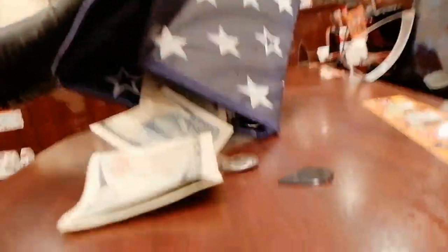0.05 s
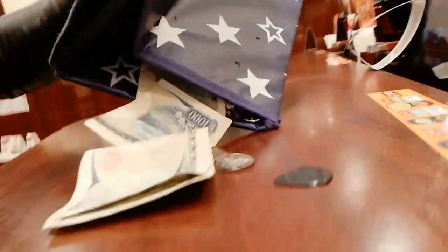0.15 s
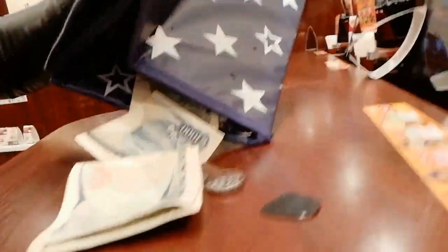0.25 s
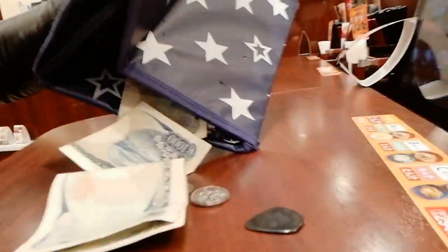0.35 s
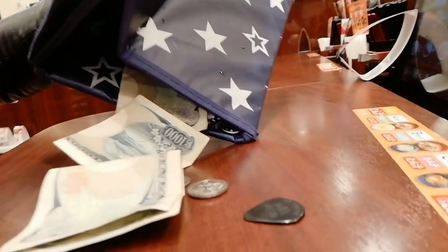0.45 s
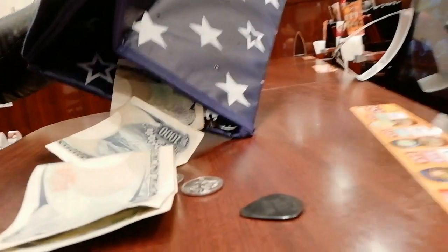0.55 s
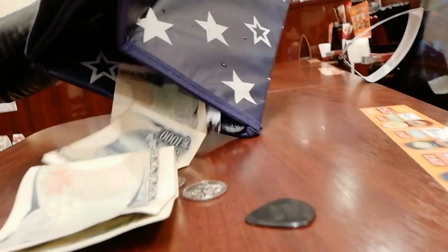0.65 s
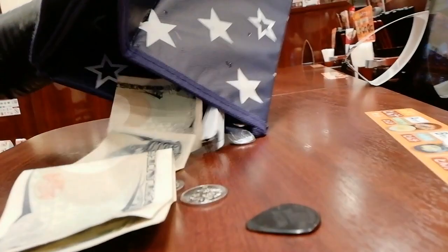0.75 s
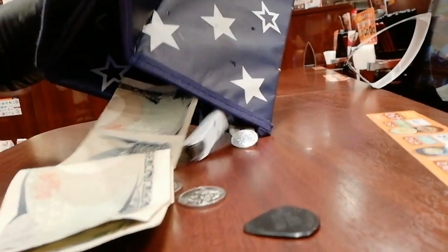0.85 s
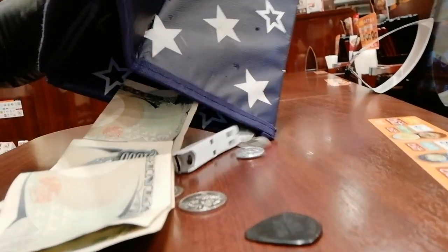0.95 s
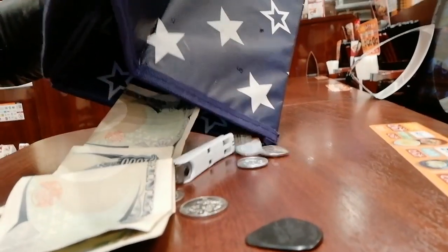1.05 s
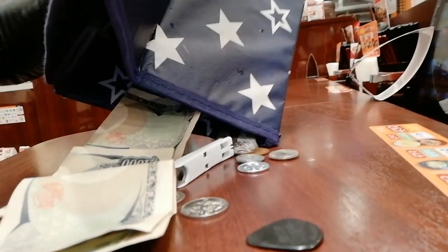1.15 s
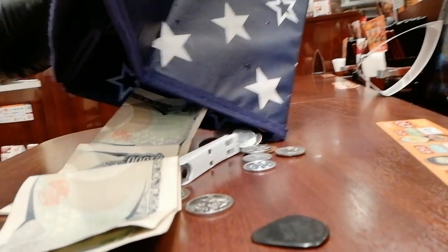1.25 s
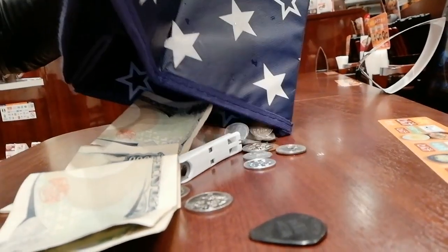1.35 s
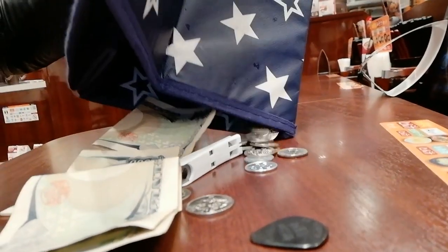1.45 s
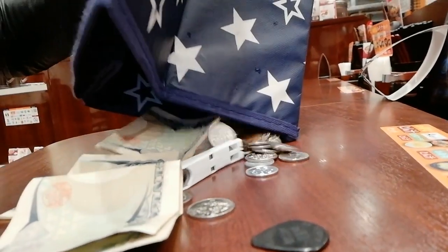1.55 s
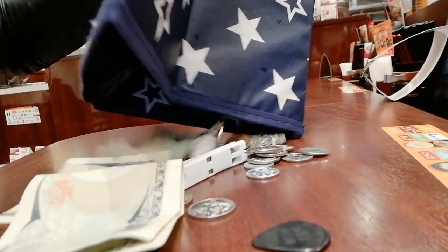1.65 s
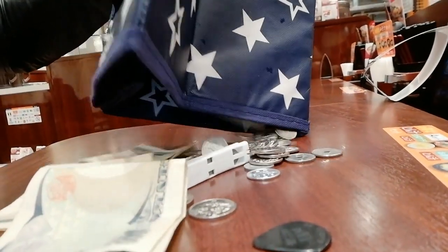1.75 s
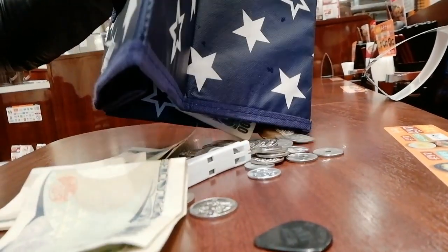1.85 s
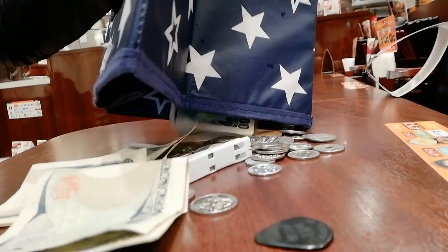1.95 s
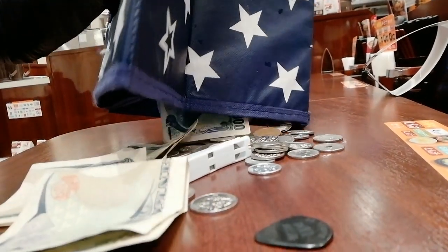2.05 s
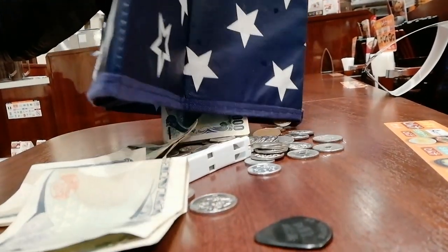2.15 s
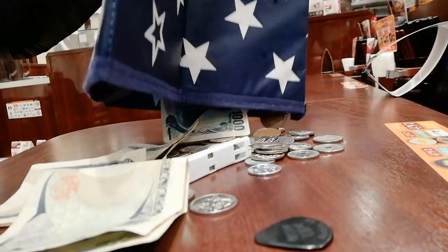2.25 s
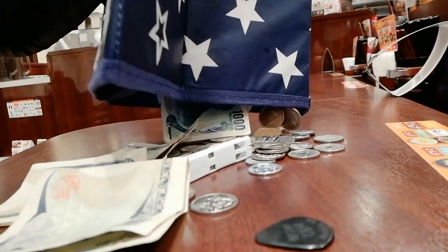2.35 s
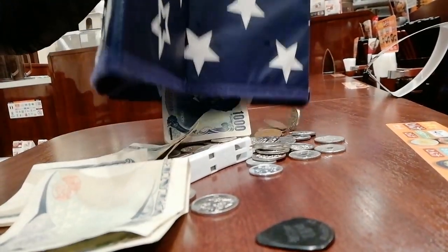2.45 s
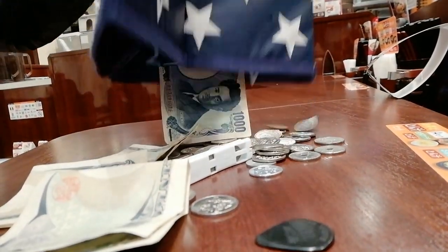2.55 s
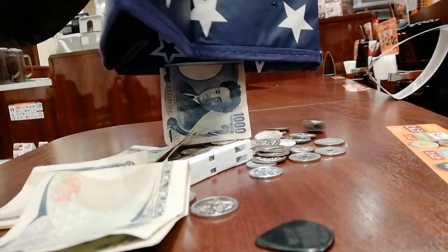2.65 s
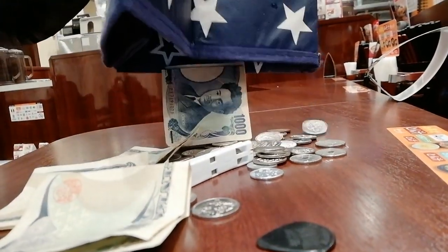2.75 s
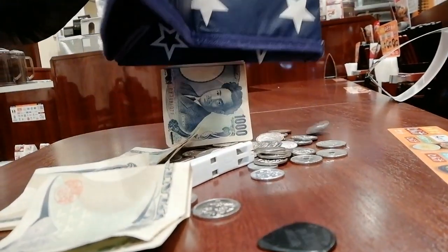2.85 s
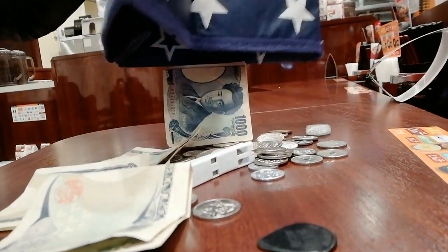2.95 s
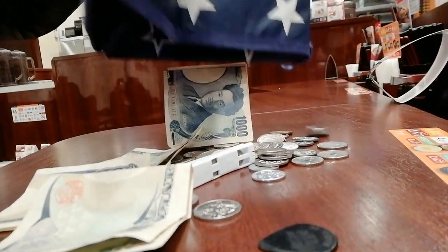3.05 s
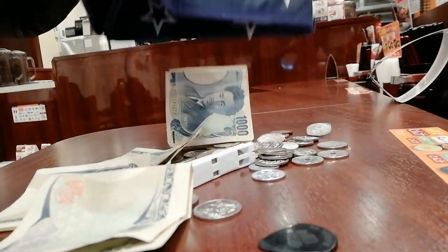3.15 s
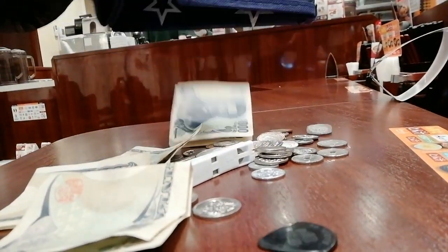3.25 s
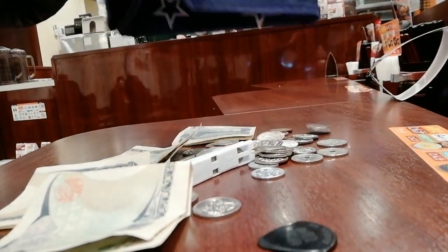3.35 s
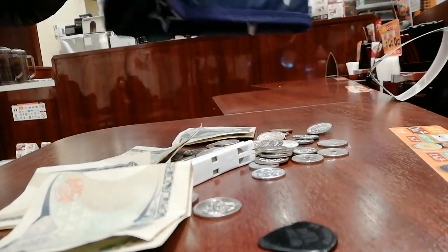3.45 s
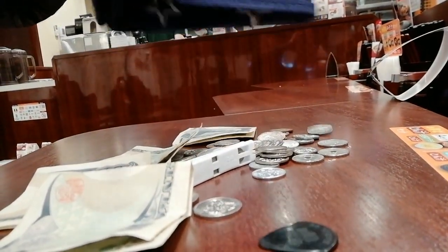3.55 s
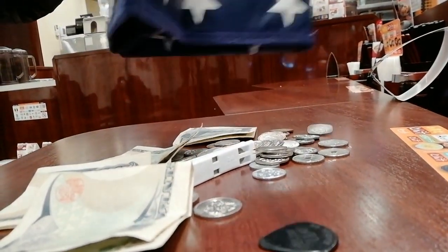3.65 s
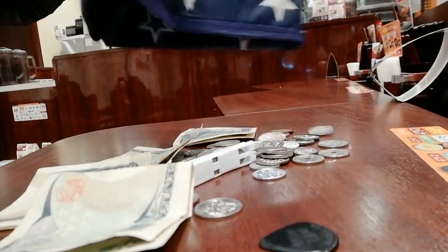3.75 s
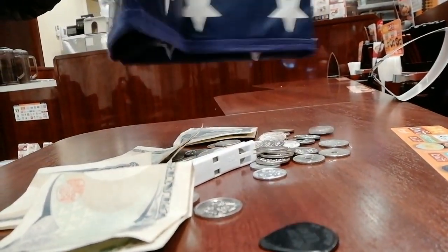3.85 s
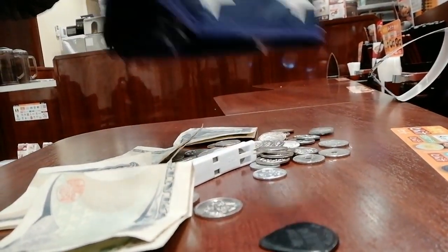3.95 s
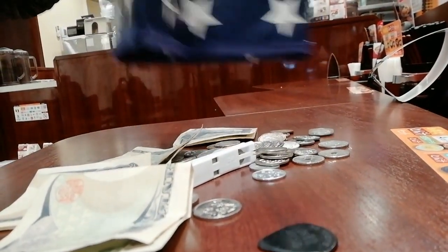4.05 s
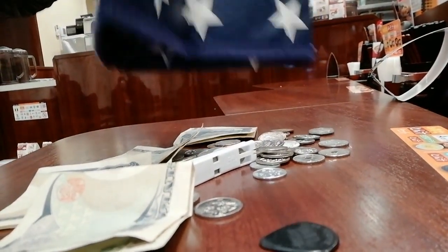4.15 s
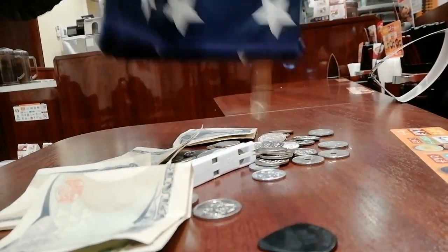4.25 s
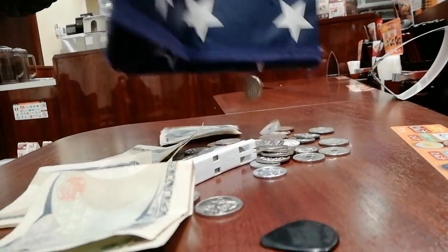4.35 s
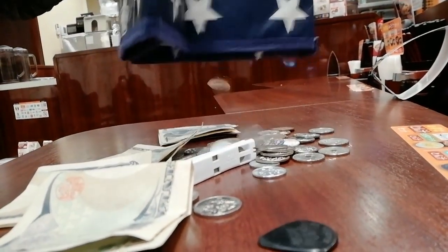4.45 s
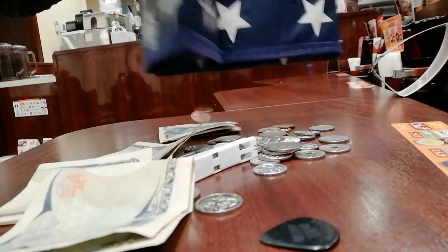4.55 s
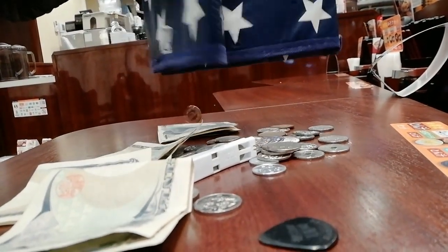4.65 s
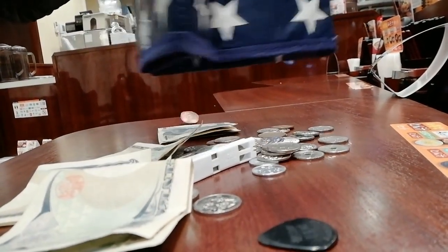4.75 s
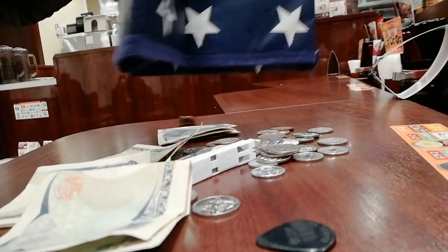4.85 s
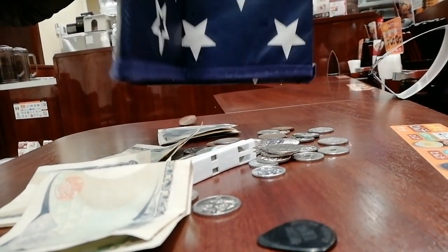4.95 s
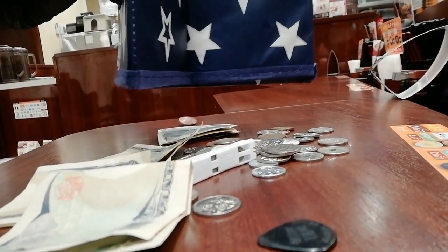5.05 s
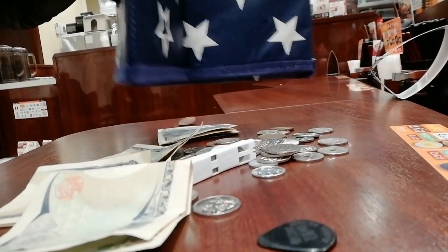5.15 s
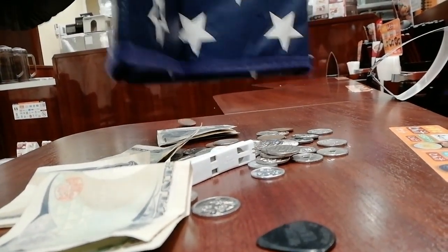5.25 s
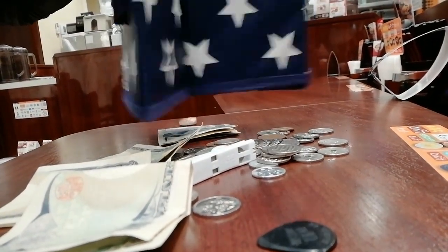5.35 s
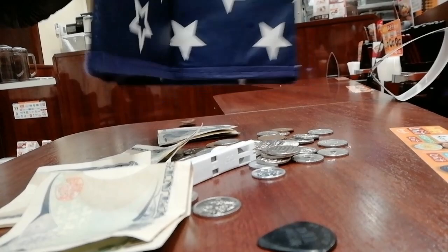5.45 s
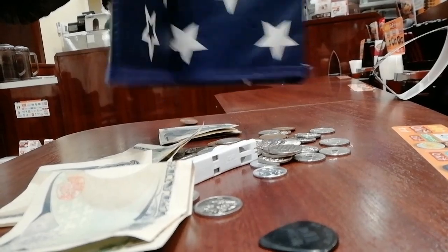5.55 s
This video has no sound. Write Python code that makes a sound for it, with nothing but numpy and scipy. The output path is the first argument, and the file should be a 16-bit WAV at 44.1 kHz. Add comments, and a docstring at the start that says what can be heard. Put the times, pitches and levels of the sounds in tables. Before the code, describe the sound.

Close to a wooden counter indoors, over a low, slightly changing room drone. From 0 to 0.75 s one coin wobbles on its rim, slapping the wood in quickening turns until it lies flat. At about 0.78 s a light plastic stick drops with hollow knocks, tapping again from 1.0 to 1.4 s, as coins begin hitting the wood. The pour thickens into dense, bright clatter and sliding metal, strongest around 1.3 to 1.8 s, with another surge near 2.05 s. Around 2.2 s the counter hums briefly; a dull scuff follows at 2.4 s and separate clinks until 2.8 s. A coin then spins quietly with an uneven, pulsing rattle to about 4.3 s. At 4.35 and 4.45 s a last coin lands hard, bounces sharply at 4.63, 4.69, 4.74 and 4.77 s, skips in shortening ticks, and from 4.86 s rolls on its edge with a fine, fluttering purr until the end, still rolling.

```python
"""Coins pour from a cloth wallet onto a wooden counter, close by; each blow is a click and a noisy clatter.
Before that one coin wobbles to rest and a plastic stick drops; later the counter top hums and a coin spins on.
A last coin falls, bounces, skips and rolls away on its rim. Rolling rims are trains of tiny impacts.
Damped sine waves give the ringing metal, stick and wood; shaped noise gives the low drone of the room.
The wood's resonances colour the clicks and clatter, and a weak answer from the room follows."""
import sys
import numpy as np
from scipy import signal
from scipy.fft import rfft, irfft, next_fast_len
from scipy.io import wavfile

SR = 44100
rng = np.random.default_rng(int(sys.argv[2]) if len(sys.argv) > 2 else 0)


def dump(signal):
    """Clip the signal to [-1, 1] and save it as 16-bit WAV at the path in sys.argv[1]."""
    limited = np.clip(np.atleast_2d(signal).T, -1, 1)
    pcm = np.round(limited * 32767).astype(np.int16)
    wavfile.write(sys.argv[1], SR, pcm)


N = 246519  # length of the scene in samples
SIDES = np.array([[.5], [-.5]])  # how a left-right difference is split: left, right

# Colour of a coin striking wood. Each row: pitch in Hz, strength in dB.
COIN_STRIKE_COLOUR = [(120, -11.5), (450, -5), (750, -4.5), (1100, 3), (1500, 9.5), (2100, 1.5), (3200, 9),
                      (4800, 5), (5800, 5.5), (9500, 13), (11500, 1.5), (14000, -27), (16000, -45)]
# Timing between left and right for sounds nearby. Each row: pitch in Hz, phase difference in radians.
NEAR_PHASE = [(200, -3), (1400, 1.33), (2500, -1), (3600, -2.5), (5200, -1), (7200, 1.86), (12600, 1.5)]
# The same for coins farther off. Each row: pitch in Hz, phase difference in radians.
FAR_PHASE = [(200, 2), (1200, 0), (3300, -1.5), (6100, -5.5), (9000, -2), (13000, 7.5)]


def amp(db):
    """Turn decibels into a gain."""
    return 10 ** (np.asarray(db) / 20)


def unit(x):
    """Scale a sound to an average (rms) level of 1."""
    return x / np.sqrt(np.mean(x ** 2) + 1e-20)


def along(points, hz):
    """Read a table of (Hz, value) rows at any pitch, on a log pitch axis."""
    f, v = np.transpose(points)
    return np.interp(np.log(hz + 1), np.log(f + 1), v)


def clock(count):
    """Time in seconds of each of count samples."""
    return np.arange(count) / SR


def curve(rows, axis=1):
    """Gain over time from a column of dB; practically silent outside its rows."""
    rows = np.asarray(rows)
    return amp(np.interp(clock(N), rows[:, 0], rows[:, axis], -120, -120))


def add(track, s, sound):
    """Mix a sound into a track at time s in seconds."""
    start = max(round(s * SR), 0)
    part = track[..., start:][..., :sound.shape[-1]]
    part += sound[..., :part.shape[-1]]


def filtered(x, response):
    """Reshape a sound by a gain and phase at each frequency."""
    size = 2 * next_fast_len(x.shape[-1] // 2 + 1024)
    spectrum = rfft(x, size) * response(np.fft.rfftfreq(size, 1 / SR))
    return irfft(spectrum, size)[..., :x.shape[-1]]


def causal(db):
    """Response with this gain in dB that rings only after a blow, never before (minimum phase)."""
    cepstrum = irfft(np.log(amp(db)))
    half = len(cepstrum) // 2
    cepstrum[1:half] *= 2
    cepstrum[half + 1:] = 0
    return np.exp(rfft(cepstrum))


def ports(hz, pan_db, phase):
    """Left and right response to a place on the counter; a positive pan_db leans further left."""
    # How sound from the counter leans. Each row: pitch in Hz, left-right difference in dB.
    counter_lean = [(300, -3.5), (700, 3), (1290, 9.5), (2380, 1), (4400, -1), (8100, 1.5), (15000, 5.5)]
    gain = amp(SIDES * (along(counter_lean, hz) + pan_db))
    even_power = gain / np.sqrt(np.mean(gain ** 2, axis=0))
    return even_power * np.exp(1j * SIDES * along(phase, hz))


def woody(colour, hz):
    """A contact's colour in dB, lifted where the wooden counter resonates."""
    # Resonances of the counter. Each row: centre in Hz, half width in Hz, lift in dB.
    resonances = [(1035, 40, 3.5), (1229, 45, 4), (1513, 50, 3.5), (2140, 50, 2), (2304, 45, 3),
                  (2600, 70, 2), (3190, 60, 3.5), (3500, 80, 3), (3830, 60, 2), (4264, 70, 4),
                  (4839, 70, 3.5), (7330, 130, 3)]
    lift = sum(db / (1 + ((hz - centre) / width) ** 2) for centre, width, db in resonances)
    return along(colour, hz) + lift


def ringing(modes, scatter_db, detune=0):
    """A struck object rings as fading sine waves, with strengths (and pitches, if detuned) new each time."""
    t = clock(count=SR // 3)
    hz, db, t60 = np.transpose(modes)
    hz = hz * (1 + detune * rng.standard_normal(len(hz)))
    strength = amp(db + scatter_db * rng.standard_normal(len(hz)))
    gain = strength * np.exp(1j * rng.uniform(0, 2 * np.pi, (2, len(hz))))  # random phases, left and right
    waves = np.exp((2j * np.pi * hz[:, None] - np.log(1000) / t60[:, None]) * t)
    return (gain @ waves).imag * (1 - np.exp(-t / 0.00004))


def humming(modes, db):
    """Modes kept ringing by steady noise, as by rubbing: each is a narrow, wavering line."""
    def lines(f):
        total = 0
        for hz, level in modes:
            width = 25 + .011 * hz  # Hz; higher modes are wider
            total = total + amp(level) / np.sqrt(width / 25) / (1 + 2j * (f - hz) / width) ** 2
        return total

    strength = np.linalg.norm(amp(np.transpose(modes)[1]))
    noise = rng.standard_normal((3, N))
    partly_shared = noise[:2] + noise[2]
    return amp(db) * strength * unit(filtered(partly_shared, lambda f: lines(f) * ports(f, 0, NEAR_PHASE)))


def ticks(rate, jitter, spread_db):
    """Small uneven impacts, rate per second (steady or changing); a longer hop lands harder."""
    rate = np.broadcast_to(rate, N)
    passed = np.cumsum(rate) / SR  # how many impacts are due so far
    chance = rng.standard_normal((int(passed[-1]), 2))
    at = np.searchsorted(passed, np.arange(len(chance)) + jitter * chance[:, 0]) % N
    strength = amp(spread_db * np.clip(chance[:, 1], -2, 1.7)) / np.sqrt(rate[at])
    return np.bincount(at, strength, N)


def chatter(blows, colour, t60, scatter_db, grit_db, pan_db, phase):
    """Each impact is a click and a short noisy scatter in the wood, over steady grit; rms 1."""
    fading_power = amp(-120 * clock(SR // 10) / t60)
    power = np.abs(signal.fftconvolve(blows ** 2, fading_power)[:N])
    noise_level = amp(scatter_db) * unit(np.sqrt(power)) + amp(grit_db)
    rough = unit(blows) + noise_level * rng.standard_normal((2, N))
    return unit(filtered(rough, lambda hz: causal(woody(colour, hz)) * ports(hz, pan_db, phase)))


def contact(colour, knock_db, bright_db, t60, pan_db, click=0.23):
    """One blow on the wood: a click (given as its share of the energy) and a brief clatter."""
    t, click = clock(count=SR // 12), np.clip(click, 0, 1)
    decay = amp(-60 * t / t60) + amp(-24) * amp(-60 * t / .06)  # with a weaker 0.06 s tail
    fade = decay * (1 - np.exp(-t / .0006))
    noise = rng.standard_normal((3, len(t))) * fade / np.linalg.norm(fade)
    clatter = .85 * noise[2] + .5 * noise[:2]  # mostly shared by left and right
    blow = np.sqrt(click) * (t == 0) + np.sqrt(1 - click) * clatter
    tilt = [(1900, knock_db), (2900, 0), (5000, 0), (7200, bright_db)]  # Hz, dB: low knock, high brightness

    def response(hz):
        return causal(woody(colour, hz) + along(tilt, hz)) * ports(hz, pan_db - 2.5, NEAR_PHASE)

    return amp(-2) * filtered(blow, response)


def bearing_down(rows):
    """Gain of a coin that presses on the wood at rows of (seconds, rise in dB, half width in seconds)."""
    t, level = clock(N), np.zeros(N)
    for s, db, width in rows:
        away = (t - s) / (width * np.where(t < s, 1, 1.02))  # builds slightly faster than it lets go
        level += db * np.exp(-np.minimum(away ** 2 / 2, 20))
    return amp(level)


def quickening(start, gap, shrink, count):
    """Times and gaps of a series whose gaps shorten by the same time at each step."""
    gaps = np.maximum(gap - shrink * np.arange(count), .003)
    return start + np.cumsum(gaps) - gaps, gaps


def presses(start, turn, shrink, first_db, last_db, width, count):
    """Gain of a tilted coin that presses harder once a turn; width is a share of the turn."""
    times, turns = quickening(start, turn, shrink, count=count)
    return bearing_down(zip(times, np.linspace(first_db, last_db, count), width * turns))


def wobbling_coin():
    """A coin on the counter wobbles faster and faster, its rim slapping the wood, until it lies flat."""
    # Level of the rubbing rim between presses. Each row: time in seconds, level in dB.
    rim_level = [(0, -37), (.42, -34), (.5, -33), (.71, -30), (.76, -64)]
    # Slaps on the wood. Each row: start in seconds, level in dB.
    slaps = [(.0765, -2), (.195, -5), (.2445, 6), (.2995, 4), (0.3955, 6), (.434, 2), (.5225, 8)]
    # Colour of this coin on wood. Each row: pitch in Hz, strength in dB.
    colour = [(290, -39), (500, -14.5), (666, -14.5), (851, -38), (914, -6.5), (1040, -6), (1410, -4),
              (1850, -2.5), (1990, -9), (2290, -4.5), (2650, -7.5), (4250, -5.5), (4570, -4), (8000, -5.5),
              (15500, -32)]
    # Modes kept ringing by the rim. Each row: pitch in Hz, relative level in dB.
    modes = [(1023, -50.5), (1820, -49), (2229, -68), (3171, -47.5), (3526, -46.5), (4667, -45),
             (5722, -49.5)]
    rim = chatter(ticks(380, jitter=.3, spread_db=3), colour, t60=.008, scatter_db=0, grit_db=-1,
                  pan_db=3, phase=NEAR_PHASE)
    rim = rim + humming(modes, db=33.5)
    turning = presses(start=0.02, turn=.0615, shrink=.00266, first_db=13.5, last_db=3, width=0.14, count=18)
    out = rim * curve(rim_level) * turning
    for s, db in slaps:
        blow = contact(colour, knock_db=-4.0, bright_db=5.5, t60=0.014, pan_db=3, click=0.38)
        add(out, s, amp(db) * blow)
    return out


def background(colour, apart_db):
    """Stereo noise of rms 1; apart_db sets how much left and right differ."""
    mid, side = filtered(rng.standard_normal((2, N)), lambda hz: amp(along(colour, hz)))
    return unit(np.array([mid + amp(apart_db) * side, mid - amp(apart_db) * side]))


def room_tone():
    """Low drone, deeper rumble and faint air of the room, each made of coloured noise."""
    # Changing levels. Each row: time in seconds, drone level in dB, rumble level in dB.
    levels = [(0, -49, -52), (.65, -46, -52), (.92, -44, -63), (1.3, -46, -63), (2.05, -37.5, -56),
              (2.25, -43, -52.5), (3.1, -45, -49.5), (3.85, -41, -50), (4.55, -44.5, -54), (4.78, -55, -63),
              (5.0, -48.5, -53.5), (5.59, -46, -50.5)]
    # Colour of the drone. Each row: pitch in Hz, strength in dB per Hz.
    drone_colour = [(70, -50), (115, -9), (150, 3), (205, 1.5), (250, 0.5), (310, -10), (400, -12.5),
                    (600, -31), (1200, -34)]
    # Colour of the rumble. Each row: pitch in Hz, strength in dB per Hz.
    rumble_colour = [(15, -9), (30, -5), (48, 3), (75, -2.5), (110, -0.5), (200, -39)]
    # Colour of the air. Each row: pitch in Hz, strength in dB per Hz.
    air_colour = [(100, -21), (400, -5), (1000, 0.5), (2000, -5.5), (5000, -10.5), (10000, -12.5),
                  (15000, -80)]
    drone = curve(levels, axis=1) * background(drone_colour, apart_db=-13.5)
    rumble = curve(levels, axis=2) * background(rumble_colour, apart_db=-23)
    return drone + rumble + amp(-40.5) * background(air_colour, apart_db=1.5)


def knocks():
    """Hollow notes of the plastic stick over a woody thud, and counter-top notes under flat coins."""
    # The stick knocks on the counter. Each row: start in seconds, level in dB.
    stick_knocks = [(0.776, -15), (0.792, -18.5), (0.8022, -19.5), (.8095, -31), (0.822, -37),
                    (1.0171, -18), (1.035, -19), (1.047, -27), (1.145, -23), (1.164, -31), (1.27, -21.5),
                    (1.324, -23), (1.429, -19.5)]
    # Notes of the stick. Each row: pitch in Hz, relative level in dB, time to fade 60 dB in seconds.
    stick_modes = [(194, -16.5, 0.26), (429, -21, 0.091), (703, -11, 0.022), (864, -1, 0.026),
                   (1160, -6, 0.029), (1536, 6.5, 0.032), (1710, -4.5, 0.025), (2252, -4.5, 0.066),
                   (2770, -5.5, 0.018)]
    # Where the stick lies. Each row: pitch in Hz, left-right difference in dB.
    stick_lean = [(200, -2), (850, -2), (1550, 13), (2300, 9.5)]
    # Colour of the counter under the stick. Each row: pitch in Hz, strength in dB.
    thud_colour = [(150, -11), (450, -2), (800, 1.5), (1700, -5), (2800, -12), (5000, -16)]
    # Coins land flat. Each row: start in seconds, level in dB.
    flat_landings = [(4.3493, -14), (4.4502, -7)]
    # Notes of the counter top. Each row: pitch in Hz, relative level in dB, time to fade 60 dB in seconds.
    board_modes = [(170, -19, .09), (1110, -14, .06), (1224, 0, .042), (1420, -4, .03), (1900, -5, .022),
                   (2380, 1, .02), (2800, 3.5, .018), (3430, 0, .018)]
    stick, thud, board = np.zeros((3, 2, N))
    for s, db in stick_knocks:
        add(stick, s, amp(db) * ringing(stick_modes, scatter_db=1))
        blow = contact(thud_colour, knock_db=0, bright_db=0, t60=0.25, pan_db=1)
        add(thud, s, amp(db + 26.5) * blow)
    for s, db in flat_landings:
        add(board, s, amp(db) * ringing(board_modes, scatter_db=1))
    stick = filtered(stick, lambda hz: amp(SIDES * along(stick_lean, hz)))
    return stick + thud + filtered(board, lambda hz: ports(hz, 0, NEAR_PHASE))


def falling_coins():
    """Coins strike the counter and heap, each with a short clink at its own pitch and a thin ring."""
    # Hits on the counter, loud and soft: first the plastic stick landing, then coins of the pour and just
    # after. Each row: start in seconds, level in dB, low knock in dB, brightness in dB, time for the clatter to
    # fade 60 dB in seconds.
    hits = [(0.7767, -3.5, 13, 3.5, 0.0078), (0.8345, -10, 9, 8, 0.032), (0.8965, -19, 3, 14, .025),
            (0.9122, 3, 5, -0.5, 0.025), (0.947, -4.5, 6, 2, .022), (.967, -11, 3, -7, .015),
            (.975, -7, 0, 8, 0.011), (0.991, 2.5, 5, 5, 0.023), (1.0091, 6, 3.5, 2, 0.022),
            (1.195, -0.5, 9, 3, 0.034), (1.219, -9, 5, 7, 0.014), (1.239, -2, 2, 2, 0.016),
            (1.2562, 4.5, 7, -4, 0.013), (1.2698, 8.5, 2, -31, 0.01), (1.3013, 3.5, 2, -8, .012),
            (1.32, 9.5, -8, -7.5, .025), (1.3522, 8.5, 5, -1.5, 0.086), (1.3731, 4, 2, 1.5, 0.026),
            (1.399, 1, 2, -7, .015), (1.428, 13, 3, -11.5, 0.059), (1.471, 3.5, 6.5, -32, 0.021),
            (1.5169, 7.5, -2, -4.5, .04), (1.5271, 5.5, 8, 0, .04), (1.534, 5.5, 7, -9, .025),
            (1.556, -2, -4, 2, 0.017), (1.587, 2, -7, -1, .015), (1.6135, 5, 3, 2, 0.057),
            (1.626, 11.5, 5, -31, 0.046), (1.654, 11.5, -2, -17, 0.0051), (1.6874, 13.5, 0.5, -9, 0.051),
            (1.722, 6, -3, -24, .019), (1.7485, 0, 9, 2.5, 0.033), (1.759, 6.5, 6, -8, 0.096),
            (1.7785, 9.5, -1, -17, 0.023), (1.8241, 1.5, -3, -5, .02), (1.844, 0.5, 2, -1, .018),
            (1.867, 3, -8, -4, .014), (1.882, -7, -5, -4, .014), (1.901, -6, -9, -7, .014),
            (1.981, 0, -11, -5, .02), (2.0014, 5.5, -1.5, -8, 0.074), (2.025, 0, 6, -16, 0.017),
            (2.036, -5, 8, -15, 0.018), (2.0493, 5.5, 8.5, -2.5, 0.013), (2.0657, 5, -14, -4, 0.1),
            (2.223, 2.5, 2, -3.5, 0.22), (2.2446, 4, -10, -2, 0.22), (2.2698, 5.5, -5, 0.5, 0.051),
            (2.3747, -9.5, -4, -1.5, 0.033), (2.505, 7.5, -3, -0.5, 0.028), (2.539, 3.5, -1.5, -4, 0.1),
            (2.5762, 9.5, -0.5, -7, 0.16), (2.621, 6, -12, -10.5, 0.02), (2.7703, 2, 3.5, -8, 0.18)]
    # Clink of a coin held against others. Each row: pitch in Hz, relative level in dB,
    # time to fade 60 dB in seconds.
    coin_on_coin = [(2350, -31, .04), (3000, -27, .04), (3850, -27.5, .04), (4850, -28, .04)]
    # Ring of the coins. Each row: pitch in Hz, relative level in dB, time to fade 60 dB in seconds.
    metal = [(8000, -17, .15), (9216, -11, .18), (10508, -14, .18), (11750, -18, .15), (12910, -8, .2),
             (12965, -8, .2)]
    # Where coins land. Each row: time in seconds, lean to the left in dB, ring against the hit in dB.
    landing_places = [(.8, 8, -29), (1.4, 8, -52), (1.66, 14, -45), (2.0, 1, -46), (2.25, -1.5, -31.5),
                      (2.6, 2, -32.5)]
    out, clinks = np.zeros((2, 2, N))
    when, pan_db, ring_db = np.transpose(landing_places)
    for s, db, knock_db, bright_db, t60 in hits:
        pan = np.interp(s, when, pan_db)
        blow = contact(COIN_STRIKE_COLOUR, knock_db, bright_db, t60, pan, click=.25)
        add(out, s, amp(db - 1.38) * blow)
        add(clinks, s, amp(db) * ringing(coin_on_coin, scatter_db=3, detune=.05))
        ring = ringing(metal, scatter_db=3, detune=.003)
        add(out, s, amp(db + np.interp(s, when, ring_db)) * ring)
    return out + filtered(clinks, lambda hz: ports(hz, 5.7, NEAR_PHASE))


def pour():
    """Coins jostle and slide over each other onto the heap: uneven impacts and ringing modes."""
    # Level of the sliding coins. Each row: time in seconds, level in dB.
    slide_level = [(.87, -40), (.92, -34.5), (1.0, -30), (1.25, -26), (1.49, -26), (1.6, -21),
                   (1.76, -22.5), (1.82, -25.5), (1.95, -28), (2.06, -22.5), (2.15, -45), (2.35, -57)]
    # Colour of the sliding coins. Each row: pitch in Hz, strength in dB.
    colour = [(290, -47), (500, -10.5), (553, -25.5), (748, -7.5), (1250, -12.5), (1350, -14), (1490, -4.5),
              (2010, -9.5), (3100, -9), (4910, -11.5), (5350, -13), (9370, -10), (12100, -16.5),
              (13200, -17), (15500, -26)]
    # Modes the heap keeps ringing. Each row: pitch in Hz, relative level in dB.
    modes = [(1244, -45.5), (1523, -45.5), (2293, -53), (3031, -49), (3941, -46), (4296, -49),
             (4840, -47.5), (9216, -47), (10508, -49), (12931, -51)]
    jostle = chatter(ticks(330, jitter=0.98, spread_db=3.5), colour, t60=0.018, scatter_db=3, grit_db=-4,
                     pan_db=-1, phase=NEAR_PHASE)
    return curve(slide_level) * (jostle + humming(modes, db=30))


def humming_counter():
    """The counter top hums a rough, fading note under coins that land flat."""
    # Modes of the counter top. Each row: pitch in Hz, relative level in dB.
    modes = [(1211, -32.5), (2455, -43)]
    start_s, attack_s, t60_s = 2.218, 0.0027, 0.49
    age = clock(N) - start_s
    level = np.clip(age / attack_s, 0, 1) * amp(-60 * np.abs(age) / t60_s)
    return level * humming(modes, db=2.5)


def scuff():
    """A brief dull rub on the counter: noise that swells quickly and dies away."""
    # Colour of the rub. Each row: pitch in Hz, strength in dB.
    colour = [(500, -24), (1000, 4), (2200, 2), (4500, -4), (6500, -40), (12000, -37)]
    start_s, attack_s, t60_s = 2.417, 0.007, 0.27
    age = clock(N) - start_s
    level = np.clip(age / attack_s, 0, 1) * amp(-29 - 60 * np.abs(age) / t60_s)
    return level * background(colour, apart_db=-2)


def spinning_coin():
    """A coin from the pour circles beyond the heap; the harder its rim presses, the longer it hops."""
    # Level between presses. Each row: time in seconds, level in dB.
    rim_level = [(2.56, -29.5), (2.66, -30), (2.74, -34), (3.05, -37), (3.35, -38), (4.33, -36.5),
                 (4.38, -32), (4.53, -32), (4.58, -23), (4.62, -37), (4.85, -36)]
    # It leans on its rim in uneven turns. Each row: time in seconds, rise in dB, half width in seconds.
    leans = [(2.675, 4.5, 0.017), (2.745, 4, 0.02), (2.84, 5.5, .026), (2.936, 10.5, 0.014),
             (3.012, 8, 0.021), (3.1, 7, 0.019), (3.168, 7, 0.02), (3.249, 9, 0.013), (3.309, 8.5, 0.013),
             (3.41, 8, 0.028), (3.531, 9, 0.011), (3.584, 9.5, 0.02), (3.645, 7.5, 0.018),
             (3.738, 8.5, 0.0092), (3.783, 9, .012), (3.837, 6, 0.0089), (3.972, 7.5, 0.028),
             (4.055, 7.5, 0.0073), (4.1, 5.5, 0.0063), (4.135, 5.5, 0.011), (4.21, 2.5, .012),
             (4.29, 4.5, 0.013)]
    # Colour of this coin on wood. Each row: pitch in Hz, strength in dB.
    colour = [(290, -65), (500, -25.5), (1040, -6), (1310, -13), (1430, -5), (2160, -7), (2360, -16),
              (2610, -6.5), (4310, -8.5), (4800, -12.5), (5500, -7), (6250, -16), (7340, -8), (10200, -22),
              (11100, -24), (15500, -32)]
    # Modes kept ringing by the rim. Each row: pitch in Hz, relative level in dB.
    modes = [(1055, -55), (1480, -52), (1800, -53.5), (2159, -55.5), (3171, -51), (3833, -50.5),
             (4160, -51.5), (4360, -49), (10900, -56)]
    press = bearing_down(leans)
    hops = ticks(340 / press, jitter=.06, spread_db=1)  # 340 per second when pressing lightly
    rim = chatter(hops, colour, t60=.008, scatter_db=7, grit_db=1, pan_db=-.8, phase=FAR_PHASE)
    return (rim + humming(modes, db=37.5)) * curve(rim_level) * press


def bending(hz):
    """Bending waves in the wood: the treble outruns the bass and spreads a click."""
    delay_s = 0.00118  # travel time at 1 kHz
    return np.exp(-4j * np.pi * delay_s * np.sqrt(1000 * hz))


def last_coin():
    """One coin drops by the heap, bounces on its rim and skips; its beating mode pairs ring on."""
    # Two pairs of close modes. Each row: pitch in Hz, relative level in dB, time to fade 60 dB in seconds.
    coin_modes = [(7770, -16, .36), (7805, -16, .36), (12925, -15.5, .5), (12960, -14.5, .5)]
    # Drops. Each row: start in seconds, level in dB, low knock in dB, brightness in dB,
    # time for the clatter to fade 60 dB in seconds, ring in dB.
    drops = [(4.3495, 13.5, -4, -11, 0.019, -22), (4.354, 13, -4.5, -8, 0.029, -27),
             (4.4493, 15.5, -2, -15.5, 0.015, -29), (4.525, 9.5, 7, -11, 0.036, -24),
             (4.5308, 2.5, 6, 2, 0.049, -14.5)]
    # Bounces. Each row: start in seconds, level in dB, low knock in dB, brightness in dB, ring in dB.
    bounces = [(4.6297, 23.5, 0.5, -4, -18.5), (4.685, 20, -0.5, -2, -23), (4.7352, 12, 7, 5, -29),
               (4.7726, 12.5, 9.5, 4, -14)]
    # Colour of a bounce. Each row: pitch in Hz, strength in dB.
    bounce_colour = [(120, -50), (200, -12), (338, -31), (476, -13), (680, -9), (1050, 2), (1750, -4),
                     (2300, -10.5), (2750, 4), (4100, -5), (4900, 1), (5500, -8.5), (7830, -11),
                     (10300, -16), (13500, -28), (15000, -88)]
    # Light, uneven contacts of the rim, mostly in shortening hops. Each row: start in seconds, level in dB.
    skips = [(4.785, -1.5), (4.798, -7.5), (4.8131, -10), (4.83, -13.5), (4.8417, -6.5), (4.851, -9.5),
             (4.86, -10), (4.8656, -8), (4.87, -7), (4.8765, -11), (4.8815, -6.5)]
    out, rim = np.zeros((2, 2, N))
    for s, db, knock_db, bright_db, t60, ring_db in drops:
        blow = contact(COIN_STRIKE_COLOUR, knock_db, bright_db, t60, pan_db=5.5, click=0.28)
        add(out, s, amp(db) * blow)
        # a flat landing damps the lower pair of modes
        add(out, s, amp(ring_db) * ringing(coin_modes[2:], scatter_db=1.5))
    for s, db, knock_db, bright_db, ring_db in bounces:
        blow = contact(bounce_colour, knock_db, bright_db, t60=0.03, pan_db=4.5, click=.85)
        add(rim, s, amp(db) * blow)
        add(out, s, amp(ring_db) * ringing(coin_modes, scatter_db=1.5))
    for s, db in skips:
        blow = contact(COIN_STRIKE_COLOUR, knock_db=11, bright_db=4.5, t60=0.011, pan_db=7.0, click=.85)
        add(rim, s, amp(db) * blow)
    return out + filtered(rim, bending)


def rolling_coin():
    """The last coin rolls away upright, its edge ticking in longer, harder hops at every lurch."""
    # Level between lurches. Each row: time in seconds, level in dB.
    rim_level = [(4.855, -26), (4.93, -28.5), (4.98, -29), (5.2, -27.5), (5.35, -29.5), (5.59, -29)]
    # Lurches of the upright coin. Each row: time in seconds, rise in dB, half width in seconds.
    lurches = [(4.985, 4, 0.019), (5.063, 6, 0.0097), (5.113, 5.5, 0.021), (5.215, 3.5, .015),
               (5.355, 3, .018), (5.465, 4.5, .022), (5.565, 2.5, 0.011)]
    # Colour of this coin on wood. Each row: pitch in Hz, strength in dB.
    colour = [(300, -34.5), (600, -18.5), (850, -15), (1050, -6), (1240, -10.5), (1600, -8), (1950, -10.5),
              (2200, -23.5), (3600, -15.5), (4700, -15.5), (6000, -30), (10200, -23), (12000, -36),
              (15000, -69)]
    # Modes kept ringing by the rim. Each row: pitch in Hz, relative level in dB.
    modes = [(1055, -61), (1233, -44), (2396, -51), (3450, -47), (7790, -55), (9302, -56), (12950, -56)]
    press = bearing_down(lurches)
    hops = ticks(320 / press, jitter=.1, spread_db=1.6)  # 320 per second when pressing lightly
    rim = chatter(hops, colour, t60=.008, scatter_db=-9, grit_db=-7, pan_db=3, phase=FAR_PHASE)
    return (rim + humming(modes, db=34.5)) * curve(rim_level) * press


def walls(x, t60):
    """The room's answer: fading noise that starts 6 ms after each sound."""
    t = clock(SR // 2)
    tail = rng.standard_normal((2, len(t))) * amp(-60 * t / t60) * (t > .006)
    return signal.fftconvolve(x, tail / np.linalg.norm(tail[0]), axes=1)[:, :N]


def scene():
    """Everything on the counter, the room's weak answer, and the room itself."""
    counter = wobbling_coin() + knocks() + falling_coins() + pour() + humming_counter()
    counter = counter + scuff() + spinning_coin() + last_coin() + rolling_coin()
    return counter + amp(-16) * walls(counter, t60=0.11) + room_tone()


def record(dry):
    """The hardest peaks clip softly; then everything from 15900 Hz up is removed."""
    soft = dry / (1 + dry ** 6) ** (1 / 6)
    return filtered(soft, lambda hz: hz < 15900)


dry = scene()
out = record(dry)
dump(out)
```